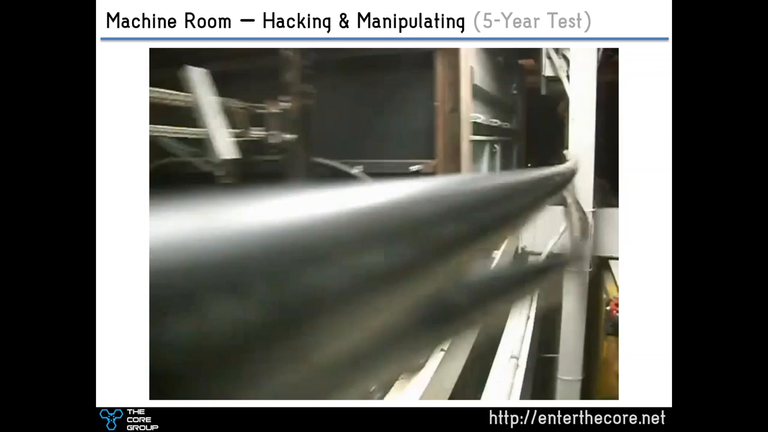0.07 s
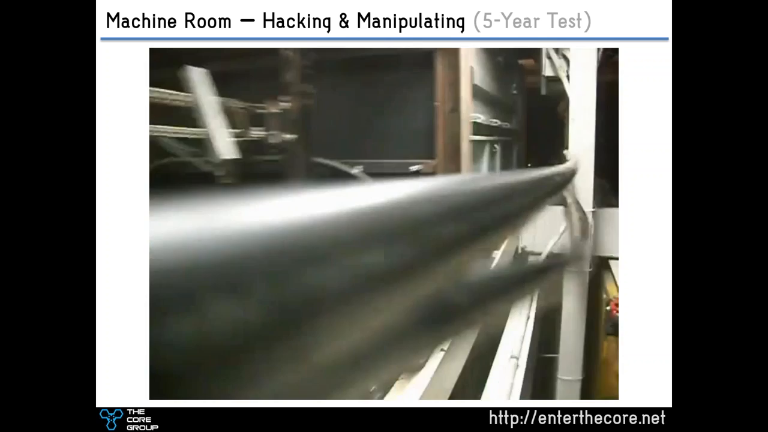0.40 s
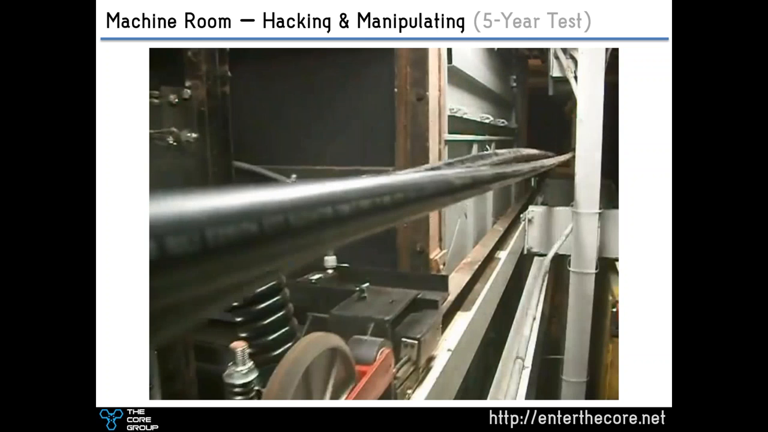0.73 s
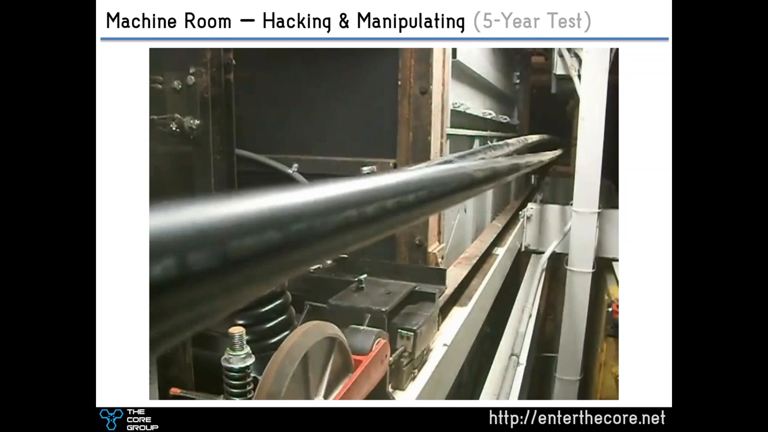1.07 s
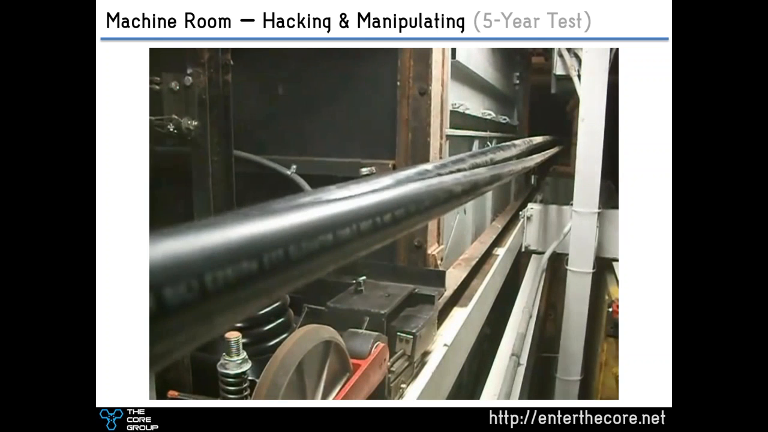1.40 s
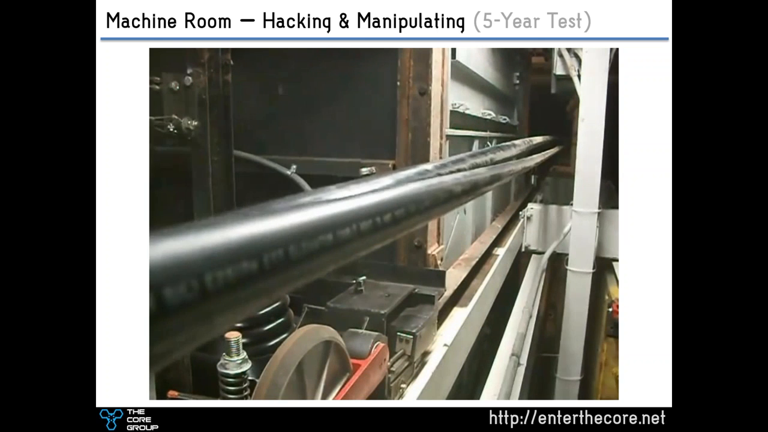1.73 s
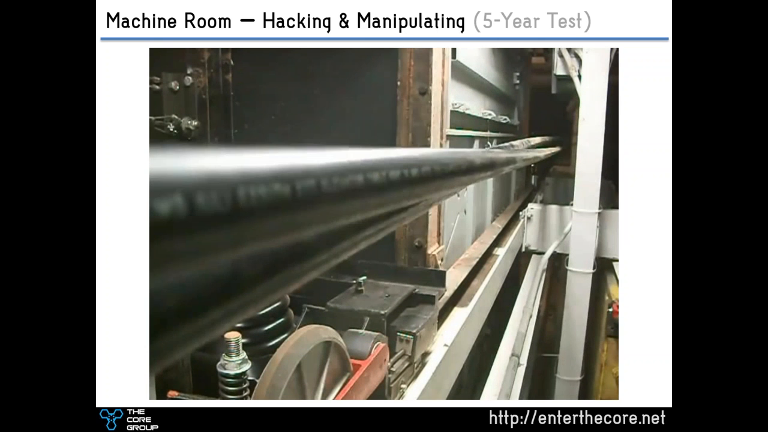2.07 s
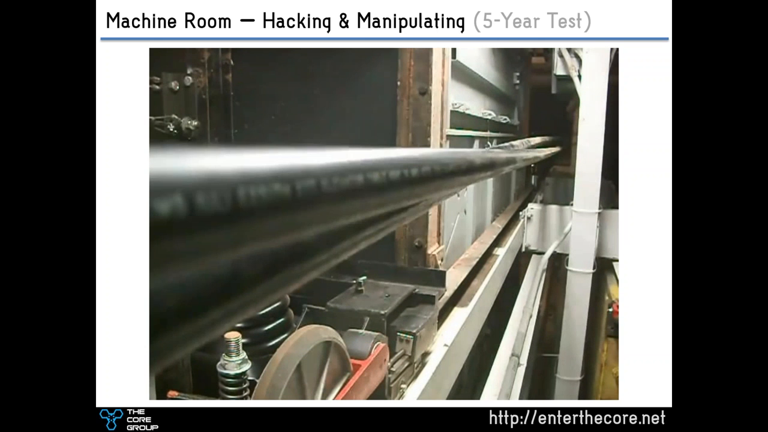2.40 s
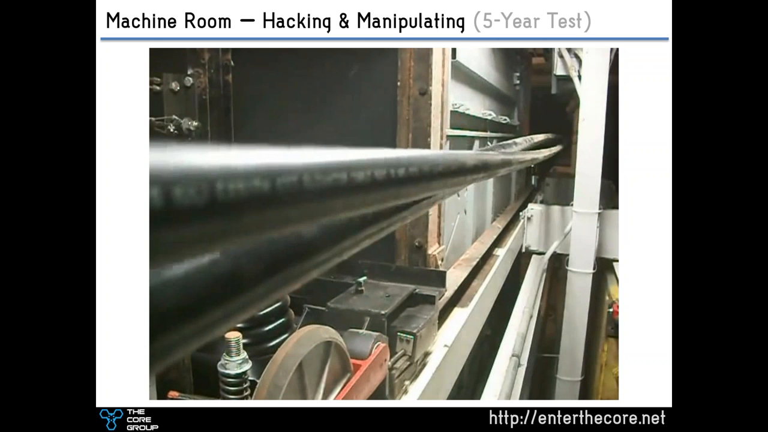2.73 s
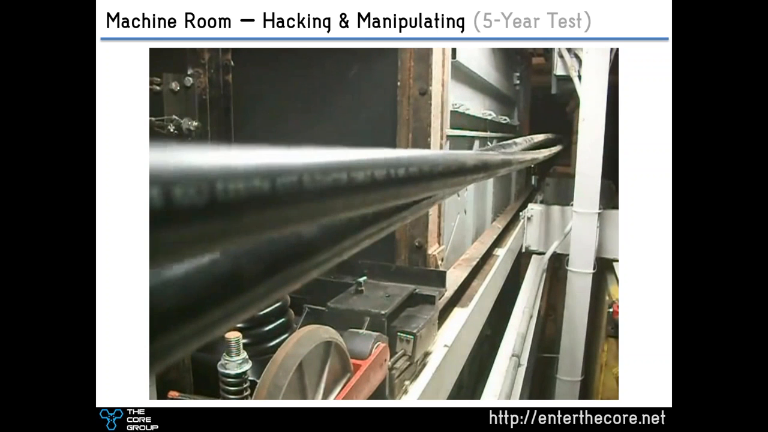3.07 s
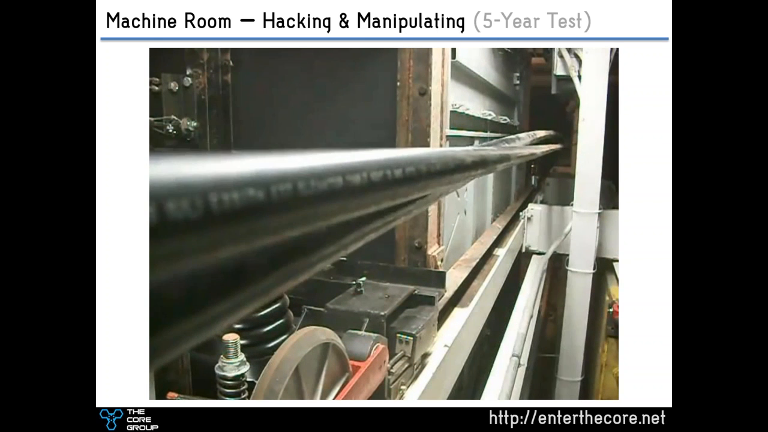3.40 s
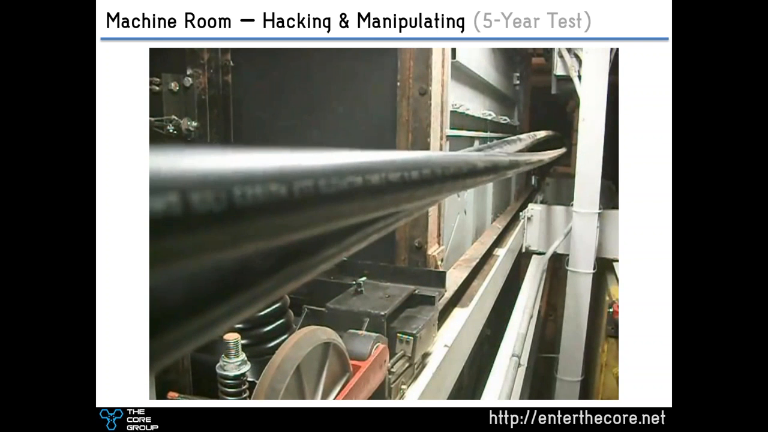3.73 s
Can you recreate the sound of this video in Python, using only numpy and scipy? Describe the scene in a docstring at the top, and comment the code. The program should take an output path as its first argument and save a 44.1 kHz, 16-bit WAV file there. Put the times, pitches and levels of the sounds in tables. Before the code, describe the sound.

Loud, rough metallic crashing with loose steel rattling and ringing inside an enclosed shaft; it sags, cuts out near two seconds, returns hard, then stops, leaving short late knocks and near silence. Single channel, dull top.

```python
"""An elevator car crashes onto its buffer at the foot of a hard-walled shaft. The roar is flickering bands of
noise; loose steelwork rattles in it as dense clicks that strike ringing modes. Three frame rings, made of
resonant noise, sound through it, over a low rumble of shudder and boom. The noise surges; the whole sound drops
out abruptly for a moment, returns and dies away; late knocks ring in the steel as fading sines."""
import sys
import numpy as np
from scipy import signal
from scipy.fft import next_fast_len
from scipy.io import wavfile

SR = 44100
rng = np.random.default_rng(int(sys.argv[2]) if len(sys.argv) > 2 else 0)


def inscribe(sig):
    """Save sig as 16-bit PCM at rate SR to the path in sys.argv[1].

    A 1-D sig is mono; a 2-D sig holds one channel per row.
    Samples are clipped to [-1, 1] before scaling.
    """
    pcm = np.round(np.clip(np.atleast_2d(sig).T, -1, 1) * 32767)
    wavfile.write(sys.argv[1], SR, pcm.astype(np.int16))


N = 165375  # 3.75 s


def amp(db):
    """Turn decibels into a linear gain."""
    return 10 ** (np.asarray(db) / 20)


def rms_one(x):
    """Scale a signal to rms 1."""
    return x / np.sqrt(np.mean(x ** 2) + 1e-20)


def in_time(rows):
    """Draw the table columns after the first as curves, sample by sample."""
    s, *columns = np.vstack(rows).T
    return [np.interp(np.arange(N) / SR, s, column) for column in columns]


def drift(rate_hz):
    """Wandering chance of rms 1: noise through two equal low-pass poles at rate_hz."""
    step = 40  # samples between the drawn points
    pole = np.exp(-2 * np.pi * rate_hz * step / SR)
    noise = rng.standard_normal(N // step + 2002)
    slow = signal.lfilter([1], [1, -2 * pole, pole * pole], noise)[2000:]  # skip the filter's start
    return np.interp(np.arange(N) / step, np.arange(len(slow)), rms_one(slow))


def ring(x, hz, t60_s):
    """A damped two-pole resonance: a unit click sets a sine of height 1 ringing."""
    decay = amp(-60 / (t60_s * SR))
    turn = 2 * np.pi * hz / SR
    return signal.lfilter([0, np.sin(turn)], [1, -2 * decay * np.cos(turn), decay * decay], x + 1e-18)


def hum(hz, width_hz, evenness):
    """Noise twice through one resonance, its chance fading evened out by a share of 0-1; rms 1."""
    t60_s = np.log(1000) / np.pi / width_hz
    once = ring(rng.standard_normal(N + SR), hz, t60_s)
    x = rms_one(ring(once, hz, t60_s)[SR:])  # the first second lets the resonance settle
    envelope = np.abs(signal.hilbert(x, next_fast_len(N)))[:N]
    return rms_one(x / (envelope + 0.37) ** evenness)


UPPER_FROM_HZ, TREBLE_FROM_HZ = 1520, 2910


def tilt(hz, upper_db, treble_db):
    """Gain in dB at one pitch: upper middle and treble each follow a curve taken about its own mean."""
    above_upper = 1 / (1 + (UPPER_FROM_HZ / hz) ** 8)
    above_treble = 1 / (1 + (TREBLE_FROM_HZ / hz) ** 8)
    upper_gain_db = (above_upper - above_treble) * (upper_db - upper_db.mean())
    return upper_gain_db + above_treble * (treble_db - treble_db.mean())


# colour of the roar, relative noise density: pitch_hz [Hz], density_db [dB per Hz]
ROAR_COLOUR = [(280, -25.5), (430, -13), (560, -10.5), (720, -12.5), (860, -7), (1050, -10.5), (1300, -8),
               (1600, -16), (2100, -11), (2700, -14), (3300, -19), (4100, -21), (4750, -18), (5500, -25),
               (6500, -27.5), (7500, -34), (8400, -21), (9200, -43.5)]
ROAR_GAIN_DB, ROAR_PATCHY_DB = 20.5, 1.49
ROAR_GRIT_DB, GRIT_RATE_HZ = 1.2, 150  # coarse grain of many small impacts


def roar(upper_db, treble_db):
    """Sixth-octave bands of noise, flickering partly together and partly each on its own."""
    points_hz, points_db = np.transpose(ROAR_COLOUR)
    edges_hz = 280 * 2 ** (np.arange(31) / 6)
    white = rng.standard_normal((2, N))
    together = drift(9)
    out = np.zeros(N)
    for k, (low_hz, high_hz) in enumerate(zip(edges_hz, edges_hz[1:])):
        band_filter = signal.butter(2, [low_hz, high_hz], "band", fs=SR, output="sos")
        band = signal.sosfilt(band_filter, white[k % 2])  # neighbours use different noise
        hz = np.sqrt(low_hz * high_hz)
        colour_db = np.interp(np.log(hz), np.log(points_hz), points_db)
        flicker_db = ROAR_PATCHY_DB * (0.83 * together + drift(11))
        out += band * amp(colour_db + tilt(hz, upper_db, treble_db) + flicker_db)
    return amp(ROAR_GAIN_DB + ROAR_GRIT_DB * drift(GRIT_RATE_HZ)) * out


# pitches of the steelwork's modes: pitch_hz [Hz]
STEEL_HZ = [432, 595, 862, 969, 1077, 1163, 1254, 1453, 1660, 2093, 2160, 2245, 2335, 2425, 2610, 2815,
            3550, 5020, 6020]
# the same modes, relative level and free ringing: level_db [dB], t60_s [s]
STEEL_MODES = [(-22, 0.69), (-8, .4), (-5.5, 0.75), (-2.5, 0.33), (-2, 0.58), (-8, 0.27), (-8.5, .3),
               (-7.5, .3), (-9, 0.78), (-8, 0.11), (-15.5, 0.73), (-15.5, 0.55), (-10.5, 0.5),
               (-14.5, 0.46), (-9, 0.33), (-9, 0.36), (-17, 0.6), (-12, 0.38), (-1, 0.42)]
RATTLES_PER_S, RATTLE_SPREAD_DB, RATTLE_GAIN_DB, RATTLE_PATCHY_DB = 400, 7.5, -6, 2.5
RATTLING_T60_S = 0.08  # loose contacts damp the rings


def rattle(upper_db, treble_db):
    """Dense uneven contacts; each mode of the steel between 900 and 4000 Hz is struck now harder, now softer."""
    length = N + SR
    sizes = amp(RATTLE_SPREAD_DB * np.minimum(rng.exponential(1, length), 4))
    signed_sizes = sizes * rng.choice([-1, 1], length)
    clicks = signed_sizes * (rng.random(length) < RATTLES_PER_S / SR)
    out = np.zeros(N)
    for hz, (mode_db, _) in zip(STEEL_HZ, STEEL_MODES):
        if 900 < hz < 4000:
            own_clicks = np.roll(clicks, rng.integers(N))  # each mode is struck at its own moments
            ringing = rms_one(ring(own_clicks, hz, RATTLING_T60_S)[SR:])
            patchy_db = RATTLE_PATCHY_DB * drift(2.4)
            out += ringing * amp(mode_db + tilt(hz, upper_db, treble_db) + patchy_db)
    return amp(RATTLE_GAIN_DB) * out


# level of roar and rattle, with its surges and abrupt dropouts, before their gains: start_s [s], level_db [dB],
# upper_db [relative dB, upper middle], treble_db [relative dB]
CRASH = [
    [(0.0, -24.5, -1, -6), (0.034, -29, -3, -2.5), (0.132, -36.5, 6, 4.5), (0.15, -28.5, -0.5, -0.5),
     (0.298, -28.5, -4.5, -4), (0.32, -34.5, 5.5, -1.5), (0.346, -24, -8, -5), (0.374, -28, -11.5, -3),
     (0.392, -23.5, -12, -8.5), (0.53, -32, 0, 2), (0.578, -25, -7.5, -7.5), (0.6, -36.5, 5.5, 11),
     (0.614, -25.5, -4, -8.5), (0.636, -41, 5, 6), (0.668, -32.5, -10, -2.5), (0.966, -24, -6.5, -10),
     (1.086, -33, 0, -6), (1.1, -23.5, -10, -15.5), (1.118, -35.5, -6.5, -3), (1.18, -24, -4.5, -7),
     (1.398, -29, -1.5, -8), (1.484, -43.5, -1, -5.5), (1.6, -41, -11.5, -10.5)],
    [(1.62, -47, -7, -6), (1.702, -51.5, -13, -4), (1.72, -37, -4.5, -10), (1.748, -32, 1.5, -12),
     (1.812, -30.5, 2.5, 0.5), (1.93, -30.5, -0.5, -11), (1.968, -25.5, -12, -8.5),
     (2.0, -23.5, -3.5, -18.5), (2.036, -34.5, -3.5, -9.5), (2.07, -59, -0.5, 1), (2.102, -75, -6, 1.5),
     (2.12, -38.5, 2.5, -7.5), (2.172, -34.5, -8.5, -16.5), (2.194, -27.5, -4, -15.5),
     (2.236, -32, -4, -8.5), (2.292, -35, -9.5, -15), (2.308, -26.5, -7, -12), (2.406, -30.5, -1.5, -7),
     (2.474, -23.5, -5.5, -6), (2.656, -32, -2.5, -13), (2.674, -35, -6.5, -11), (2.724, -36.5, -9, -21),
     (2.76, -45.5, -3, -19), (2.9, -59, -12.5, -11.5)],
]
# the dying tail under the late knocks, same columns: start_s [s], level_db, upper_db, treble_db [dB]
TAIL = [(2.921, -61.5, -1.5, -8.5), (2.99, -67, 0.5, -4), (3.038, -58, -4, -7), (3.058, -52, 4, -2),
        (3.079, -43, 5.5, -8), (3.151, -42, -6, -14), (3.175, -55, 3, -11), (3.24, -57, 0, -10),
        (3.31, -53.5, -2, -12.5), (3.376, -52.5, -7, -19), (3.397, -51, 0.5, -10.5),
        (3.46, -52, -0.5, -14.5), (3.49, -53, -6.5, -18), (3.51, -53.5, -2, -6.5), (3.56, -58, 1, -10),
        (3.62, -59, -8.5, -16), (3.75, -68.5, -3, -12.5)]


def crash():
    """Roar and rattle surge, drop out and die away together, with a shared changing colour."""
    level_db, upper_db, treble_db = in_time([*CRASH, TAIL])
    return amp(level_db) * (roar(upper_db, treble_db) + rattle(upper_db, treble_db))


# level of the frame's three strongest rings, before their trims:
# start_s [s], low_ring_db [dB], middle_ring_db [dB], high_ring_db [dB]
FRAME_RINGS = [
    [(0.0, -41.5, -29.5, -31.5), (0.128, -33.5, -32.5, -28.5), (0.21, -37, -20.5, -31.5),
     (0.246, -33, -34, -31.5), (0.298, -32.5, -27.5, -33), (0.45, -42.5, -36, -44),
     (0.484, -26.5, -34, -25), (0.576, -47, -24.5, -28), (0.636, -34.5, -45, -44), (0.662, -23.5, -62, -30),
     (0.706, -26, -29, -32), (0.852, -26, -45, -33.5), (0.88, -37.5, -34, -30), (0.934, -26, -45, -24),
     (1.0, -35, -35.5, -41)],
    [(1.02, -31.5, -32, -38), (1.074, -35.5, -38, -31.5), (1.162, -30.5, -57, -45), (1.218, -32, -29, -27),
     (1.346, -33.5, -32, -41), (1.38, -36.5, -47, -40), (1.478, -33.5, -31, -31), (1.504, -39, -47, -56),
     (1.568, -39, -37, -36), (1.596, -34, -48, -35), (1.684, -60, -52, -57.5), (1.742, -56, -50, -27),
     (1.816, -55, -49, -33), (1.836, -31, -41, -28.5), (1.95, -44, -34.5, -32)],
    [(1.97, -39, -48, -22.5), (1.998, -43, -46, -44), (2.026, -34, -37, -39), (2.054, -52, -59, -56),
     (2.082, -83, -74, -79), (2.094, -78, -78, -86), (2.108, -74, -60, -64), (2.124, -30.5, -36, -34),
     (2.142, -32.5, -25, -26), (2.164, -44, -50, -52), (2.192, -25.5, -24.5, -32), (2.222, -42, -49, -40),
     (2.266, -54, -33.5, -41), (2.31, -32.5, -63, -45), (2.35, -47, -36, -20.5)],
    [(2.37, -36, -28, -24), (2.434, -28, -39, -27.5), (2.472, -51, -30, -28), (2.508, -24.5, -37, -25.5),
     (2.688, -33.5, -36.5, -36), (2.764, -54, -59, -45.5), (3.03, -67, -67, -73), (3.076, -73, -71, -44.5),
     (3.15, -46, -47, -50), (3.242, -84, -60, -71), (3.326, -39.5, -75, -61), (3.368, -59.5, -68, -83),
     (3.556, -53.5, -55, -49), (3.588, -59, -61, -89.5), (3.75, -82.5, -72, -80)],
]
RING_HZ, RING_WIDTH_HZ, RING_TRIM_DB = [430, 560, 860], [50, 62, 42], [-1.5, -1.5, 0]
RING_EVENNESS = 0.3  # how far the chance fading of a ring is evened out, 0-1
RING_WANDER = 0.017  # the rings stray in pitch by this rms share


def frame_rings():
    """Three strong rings, kept sounding by the shaking and straying a little in pitch."""
    out, sample = np.zeros(N), np.arange(N)
    for db, trim_db, hz, width_hz in zip(in_time(FRAME_RINGS), RING_TRIM_DB, RING_HZ, RING_WIDTH_HZ):
        stray = drift(4.81)
        bent_time = sample + np.cumsum(RING_WANDER * (stray - stray.mean()))
        tone = np.interp(bent_time, sample, hum(hz, width_hz, RING_EVENNESS))
        out += amp(db + trim_db) * tone
    return out


# level of the low rumble: start_s [s], shudder_db [dB], boom_db [dB]
RUMBLE = [(0.0, -41.5, -46.5), (0.26, -43.5, -38), (0.29, -45, -45.5), (0.7, -52.5, -43.5),
          (0.72, -37.5, -39), (1.13, -50.5, -46.5), (1.29, -33, -37), (1.32, -38, -39), (1.71, -60, -65),
          (1.87, -51, -44), (2.05, -46, -46), (2.09, -59, -78.5), (2.12, -52, -48.5), (2.58, -37.5, -43.5),
          (2.64, -49, -49), (2.74, -44, -61), (3.02, -79, -75.5), (3.13, -65, -60.5), (3.65, -72, -75.5),
          (3.75, -115, -80)]
SHUDDER_HZ, SHUDDER_WIDTH_HZ = 35, 26
BOOM_LOW_HZ, BOOM_HIGH_HZ, BOOM_KNEE_HZ, BOOM_PATCHY_DB = 39.8, 330, 110, 2


def rumble():
    """A deep shudder of resonant noise and a lumpy boom of band noise, heavier at the bottom."""
    shudder_db, boom_db = in_time(RUMBLE)
    shudder = hum(SHUDDER_HZ, SHUDDER_WIDTH_HZ, 0)
    band_filter = signal.butter(2, [BOOM_LOW_HZ, BOOM_HIGH_HZ], "band", fs=SR, output="sos")
    boom = signal.sosfilt(band_filter, rng.standard_normal(N + SR))
    boom = boom + 0.5 * signal.lfilter(*signal.butter(2, BOOM_KNEE_HZ, fs=SR), boom)
    lumpy_db = boom_db + BOOM_PATCHY_DB * drift(5)
    return amp(shudder_db) * shudder + amp(lumpy_db) * rms_one(boom[SR:])


# late knocks, each favouring the modes near two pitches, levels before the mode levels:
# start_s [s], level_db [dB], length_s [s], lower_hz [Hz], upper_hz [Hz], upper_db [relative dB]
KNOCKS = [(1.709, -21, 0.041, 1145, 1384, 1), (2.114, -25, 0.032, 895, 1240, -0.5),
          (2.178, -30, 0.041, 1020, 1430, 8.5), (2.74, -46, 0.11, 862, 2160, 10),
          (3.041, -24, 0.11, 2140, 2610, -16), (3.053, -31, 0.22, 1110, 2380, 8.5),
          (3.08, -32, 0.18, 1066, 2815, -3), (3.303, -42, 0.07, 430, 940, 4),
          (3.384, -39, 0.082, 1660, 2810, -1.5), (3.39, -49.5, 0.063, 5050, 6050, -12),
          (3.496, -43, 0.053, 862, 2120, 4), (3.514, -49, 0.05, 5050, 6050, -14.5),
          (3.5, -46, .04, 1660, 3550, 1)]
KNOCK_REACH_OCTAVES, KNOCK_ATTACK_S, KNOCK_SCATTER_DB = 0.078, 0.0097, 0.5
KNOCK_FLUTTER_DB = 3  # the rings waver as the shaft throws them back
KNOCK_BLUR = 0.005  # chatter smears each struck mode by this rms share of its pitch


def nearness(hz, centre_hz):
    """Bell-shaped weight of a mode by its distance in octaves from a pitch."""
    return np.exp(-0.5 * (np.log2(hz / centre_hz) / KNOCK_REACH_OCTAVES) ** 2)


def knocks():
    """Each knock swells quickly in the modes near its two pitches, rings freely and is cut off after its
    length."""
    t, out = np.arange(N) / SR, np.zeros(N)
    flutter_db = KNOCK_FLUTTER_DB * drift(33)
    chatter_s = np.cumsum(KNOCK_BLUR * drift(37.5)) / SR
    for start_s, level_db, length_s, lower_hz, upper_hz, upper_db in KNOCKS:
        age_s = np.maximum(t - start_s, 0)
        swell = np.minimum(age_s / KNOCK_ATTACK_S, 1)
        shape = swell / (1 + (age_s / length_s) ** 6)
        phases, chances = rng.standard_normal((2, len(STEEL_MODES)))  # phases in cycles
        for hz, (mode_db, t60_s), phase, chance in zip(STEEL_HZ, STEEL_MODES, phases, chances):
            weight = nearness(hz, lower_hz) + amp(upper_db) * nearness(hz, upper_hz)
            if weight > 0.01:
                # each mode takes the flutter and the chatter at its own offset
                ringing_db = level_db + mode_db + KNOCK_SCATTER_DB * chance - 60 * age_s / t60_s
                gain = weight * shape * amp(ringing_db + np.roll(flutter_db, int(hz * 20)))
                cycles = hz * (age_s + np.roll(chatter_s, int(hz * 10))) + phase
                out += gain * np.sin(2 * np.pi * cycles)
    return out


def scene():
    """Crash, frame rings, rumble and late knocks, added as one channel."""
    return (crash() + frame_rings() + rumble() + knocks())[None]


TOP_STOP_HZ, HISS_DB = 9496.55, -103.5  # 80 dB down from TOP_STOP_HZ up


def record(dry):
    """The top is cut steeply; a faint hiss lies under all."""
    top_cut = signal.cheby2(12, 80, TOP_STOP_HZ, fs=SR, output="sos")
    return signal.sosfilt(top_cut, dry) + amp(HISS_DB) * rng.standard_normal(dry.shape)


dry = scene()
out = record(dry)
inscribe(out)
```